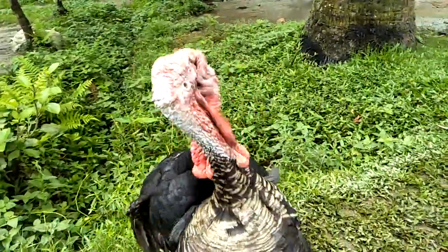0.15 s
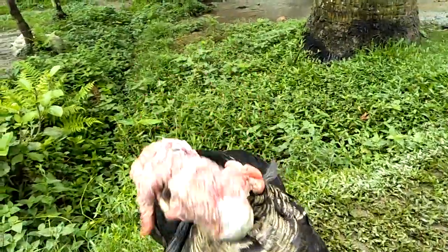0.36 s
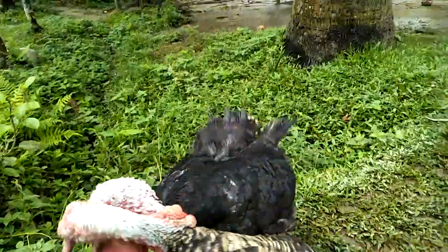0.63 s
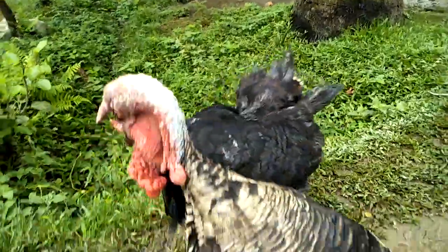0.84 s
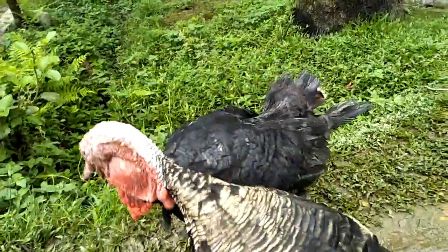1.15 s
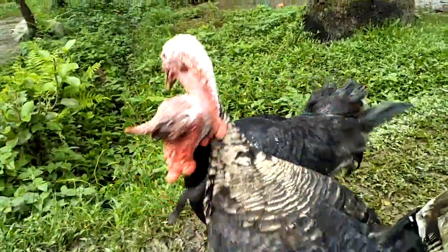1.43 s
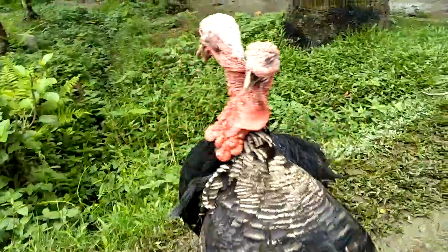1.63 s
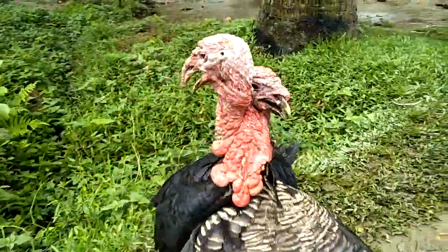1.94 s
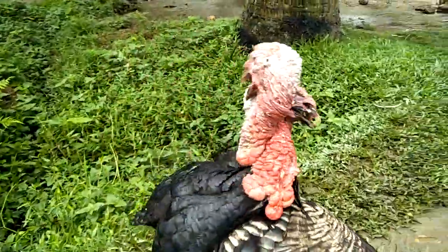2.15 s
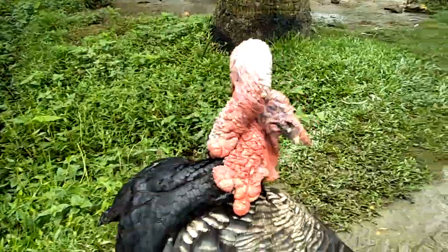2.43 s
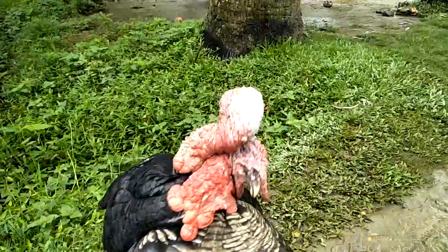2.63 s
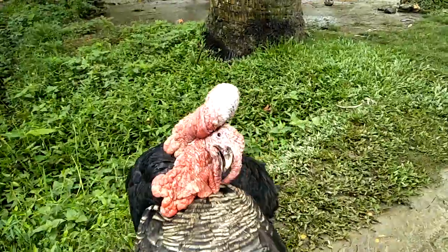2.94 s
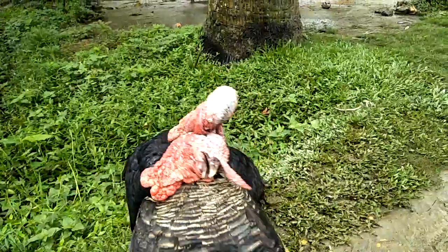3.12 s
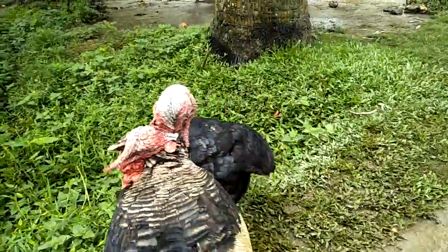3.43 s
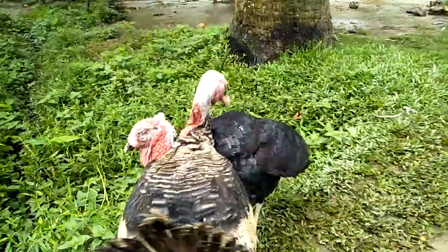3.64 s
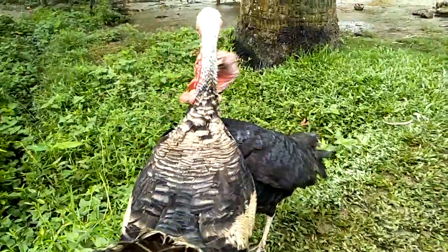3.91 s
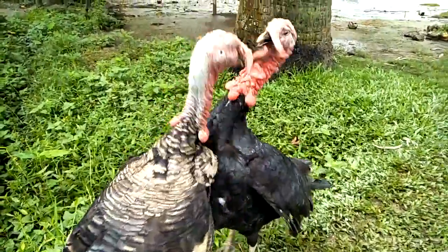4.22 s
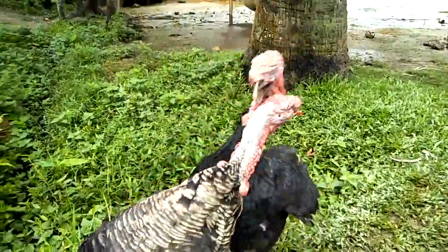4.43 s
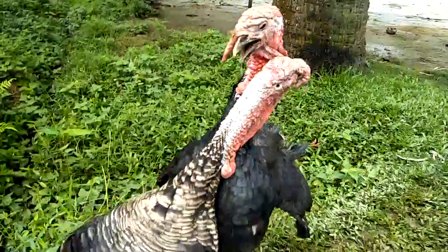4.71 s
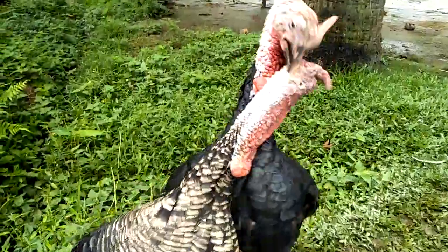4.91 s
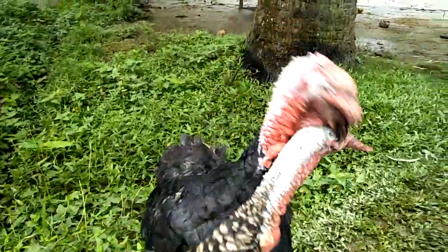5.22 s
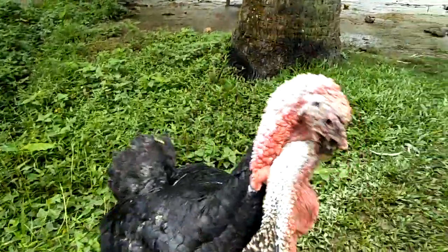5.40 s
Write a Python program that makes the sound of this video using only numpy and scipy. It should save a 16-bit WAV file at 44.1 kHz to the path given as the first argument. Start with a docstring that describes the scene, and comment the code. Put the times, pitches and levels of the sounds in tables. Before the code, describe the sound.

Two turkeys sparring close by give raspy yelps, croaks and short whistled whines, with brief hisses and small thumps in a quiet yard.

```python
"""A quiet grassy yard where two turkeys spar close by.
Their voices are swept harmonic tones: low croaks, whistled whines and quick yelps, raspy when forced.
Hisses are shaped noise; feet and wings thump and snap as short noise bursts.
Far birds chirp as gliding sines over rumble, a distant village and thin air noise.
Two early reflections and a faint noise tail answer from the yard."""
import sys
import numpy as np
from scipy import signal
from scipy.fft import rfft, irfft, next_fast_len
from scipy.io import wavfile
from scipy.ndimage import uniform_filter1d, map_coordinates

SR = 44100
rng = np.random.default_rng(int(sys.argv[2]) if len(sys.argv) > 2 else 0)


def unload_wav(signal):
    """Save mono or channel-first audio to the path in sys.argv[1] as 16-bit WAV at rate SR, clipped to [-1, 1]."""
    wavfile.write(
        sys.argv[1],
        SR,
        np.round(np.clip(np.atleast_2d(signal).T, -1, 1) * 32767).astype(np.int16),
    )


N = 245195


def amp(db):
    """Decibels to gain."""
    return 10 ** (np.asarray(db) / 20)


def unit(x):
    """Scale to rms 1."""
    return x / np.sqrt(np.mean(x ** 2) + 1e-20)


def along(points, hz):
    """(Hz, value) points read on a log frequency axis."""
    f, v = np.transpose(points)
    return np.interp(np.log(hz + 1), np.log(f + 1), v)


def curve(rows):
    """(s, value) rows as one value per sample of the scene."""
    return np.interp(np.arange(N) / SR, *np.transpose(rows))


def add(track, s, sound):
    """Mix a sound into the track at time s."""
    start = max(0, round(s * SR))
    part = track[start:start + len(sound)]
    part += sound[:len(part)]


def wobble(n, rate):
    """A smooth random curve, rate knots a second."""
    knots = rng.standard_normal(int(n * rate / SR) + 4)
    return map_coordinates(knots, [np.arange(n) * rate / SR])


def coloured(x, points):
    """Causal minimum-phase filter with the gain of the (Hz, dB) points."""
    m = 2 * next_fast_len(len(x) // 2 + SR // 20)
    gain = amp(along(points, np.fft.rfftfreq(m, 1 / SR)))
    cepstrum = irfft(np.log(gain))
    cepstrum[1:m // 2] *= 2
    cepstrum[m // 2 + 1:] = 0
    return irfft(rfft(x, m) * np.exp(rfft(cepstrum)), m)[:len(x)]


def noise(points):
    """Noise of rms 1 with the given spectrum."""
    return unit(coloured(rng.standard_normal(N), points))


def resonance(x, hz, width_hz):
    """What one resonance of gain 1 passes."""
    return signal.lfilter(*signal.iirpeak(hz, hz / width_hz, SR), x)


def sine(pitch_hz):
    """A sine that follows a pitch curve."""
    return np.sin(2 * np.pi * np.cumsum(pitch_hz) / SR)


# Decay of the yard's tail. Each row: frequency in Hz, t60 in s at linger 1.
YARD_DECAY = [(200, 1), (1200, 0.43), (3500, 0.91), (8000, 1)]
LEAF_SWAY_S, LEAF_SWAY_RATE_HZ = .00016, 60


def yard(x, linger=1, rise_s=0.0087):
    """Ground, trees and walls return a thin tail that builds and decays; moving leaves blur its pitch."""
    hz, t, z = signal.stft(rng.standard_normal(SR), SR, nperseg=256)
    decay = amp(-60 * t / (linger * along(YARD_DECAY, hz)[:, None]))
    build_up = 1 - np.exp(-t / rise_s)
    tail = signal.istft(z * decay * build_up, SR, nperseg=256)[1]
    echo = signal.fftconvolve(x, tail / np.linalg.norm(tail))
    sway = LEAF_SWAY_S * SR * wobble(N, LEAF_SWAY_RATE_HZ)
    return map_coordinates(echo, [np.arange(N) + sway])


def far_flock(count=26, low_hz=950, high_hz=2300):
    """Other fowl whistle softly across the village, with their echo; rms 1."""
    out = np.zeros(N)
    n = SR // 10
    for when, height, glide in rng.uniform(size=(count, 3)):
        start_hz = low_hz * (high_hz / low_hz) ** height
        glide_ratio = np.geomspace(1, .9 + .15 * glide, n)
        pitch = start_hz * glide_ratio * (1 + .02 * wobble(n, 250))
        add(out, when * N / SR, signal.windows.hann(n) * sine(pitch))
    return unit(out + yard(out))


# Thin hiss of the air. Each row: time in s, level in dB before a 4 dB lift.
AIR_LEVEL = [(1.6, -76.5), (3.5, -75.5)]
# Wash of the far village. Each row: time in s, level in dB before its own flicker.
VILLAGE_LEVEL = [(1.1, -68.5), (1.58, -70), (2.3, -62), (4.6, -69), (5.1, -65)]
# Its spectrum. Each row: frequency in Hz, relative level in dB per Hz.
VILLAGE_SPECTRUM = [(130, 4), (600, -4.5), (1050, 3.5), (1250, -6.5), (1700, 0), (2600, -8), (3200, -4),
                    (4800, -33)]
# The recorder's noise gate briefly pulls the background down. Each row: time in s, gain in dB.
GATE_DIPS = [(3.21, -1), (3.28, -12.5), (3.31, -5.5), (3.34, -17.5), (3.36, 2.5), (4.85, 1), (4.96, -7.5),
             (5.02, 0)]


def background(rumble_db=-61, flock_db=-5):
    """Low rumble, the flickering wash of the far village with its fowl, and a thin, nearly steady hiss."""
    rumble_spectrum = [(15, -19.0), (45, -2.5), (80, 3.0), (130, -8.0), (900, -70.5)]
    rumble = amp(rumble_db + 2.3 * wobble(N, 8.1)) * noise(rumble_spectrum)
    wash = amp(5.7 * wobble(N, 36)) * noise(VILLAGE_SPECTRUM)
    village = amp(curve(VILLAGE_LEVEL)) * (wash + amp(flock_db) * far_flock())
    air = amp(curve(AIR_LEVEL) + 4) * noise([(6500, -0.13), (10000, -0.52), (15500, 0.14)])
    return (rumble + village + air) * amp(curve(GATE_DIPS))


# Filter for voice and hiss. Each row: frequency in Hz, gain in dB.
VOICE_GAIN = [(300, -18), (480, -11), (700, -0.5), (1900, 1), (2500, 0.5), (3300, -8.5), (3750, -20),
              (4300, -34.5), (6000, -47), (10000, -54)]


def voice_filter(x):
    """One filter for voice and hiss: full middle band, weak lows, steep recorder cut above about 3.5 kHz."""
    return coloured(x, VOICE_GAIN)


# Hisses. Each row: start in s, rise in s, hold in s, fall in s, level in dB before the voice filter,
# beak resonance in Hz.
HISSES = [ (0, 0.0004, 0.015, 0.18, -35.5, 1530), (0.532, 0.11, 0.16, 0.2, -37.5, 1530),
          (1.894, 0.19, 0.095, 0.068, -45, 2090), (4.469, 0.012, 0.028, 0.18, -42, 2353),
          (5.424, 0.011, 0.07, 0.11, -42.5, 2800), ]
# Hiss spectrum. Each row: multiple of the beak resonance, relative level in dB per Hz.
HISS_SPECTRUM = [(0.3, -23.5), (0.62, -8.5), (0.8, -7.5), (1, -1.5), (1.139, -5), (1.401, -0.5),
                 (1.801, -14.5), (3, -17)]
# Whistles in a hiss. Each row: multiple of the beak resonance, width in Hz, gain in dB.
EDGE_TONES = [(.635, 16, 8.5), (0.999, 22, 2.5)]
HISS_RISE_DB, HISS_FALL_DB, HISS_FALL_POWER = 16.5, 26.5, 0.53  # drops fast at first, then trails off
HISS_GRIT_DB, HISS_GRIT_RATE_HZ = 1.3, 350


def hisses():
    """Unvoiced air sputters and whistles through the beak; a higher beak resonance is brighter."""
    out = np.zeros(N)
    for s, rise, hold, fall, db, beak_hz in HISSES:
        t = np.arange(int((rise + hold + fall) * SR)) / SR
        before = np.maximum(rise - t, 0) / rise
        after = np.maximum(t - rise - hold, 0) / fall
        level_db = db - HISS_RISE_DB * before - HISS_FALL_DB * after ** HISS_FALL_POWER
        grit = amp(HISS_GRIT_DB * wobble(len(t), HISS_GRIT_RATE_HZ))
        sputter = rng.standard_normal(len(t)) * grit
        air = coloured(sputter, [(beak_hz * k, g) for k, g in HISS_SPECTRUM])
        whistles = sum(amp(g) * resonance(air, beak_hz * k, width) for k, width, g in EDGE_TONES)
        add(out, s, unit(air + whistles) * amp(level_db) * signal.windows.tukey(len(t), .05))
    return voice_filter(out)


# Air forced past the membranes. Each row: frequency in Hz, relative level in dB per Hz.
RASP_AIR = [(300, -8), (600, -2.5), (2900, -5.5), (8000, -16.5)]
RASP_AIR_DB, RASP_SMEAR = -20, .2


def syrinx(pitch, rasp, bright_db, clean_db=-32, forced_db=23,
           second=.52, coupling=0.74, second_db=-14, blend_hz=1450):
    """A near-pure whistle whose membranes slap, beat against each other and leak air when forced."""
    n = len(pitch)
    jitter = (.003 + .028 * rasp) * wobble(n, 600)
    phase = 2 * np.pi * np.cumsum(pitch * (1 + jitter)) / SR
    overtone_db = clean_db + bright_db + forced_db * rasp  # harder closure, stronger overtones
    tone = np.sin(phase)
    for k in range(2, 6):
        waver_db = 1.2 * k * wobble(n, 80)
        # uneven closures blur the upper partials
        slip = RASP_SMEAR * rasp ** 2 * (k - 1) * wobble(n, 650) + rng.uniform(0, 2 * np.pi)
        partial_db = overtone_db * np.log2(2 * k) / 2 + waver_db
        tone = tone + amp(partial_db) * np.sin(k * phase + slip)
    # the slower other side puts sidebands between the harmonics of low notes
    other = np.sin(second * phase + wobble(n, 120)) / (1 + (pitch / blend_hz) ** 8)
    rough = 0.002 + rasp ** 2.7
    voiced = tone * (1 + rough * coupling * other) + rough * amp(second_db) * other
    puffs = (1 + np.sin(phase)) / 2  # one a cycle
    air = unit(coloured(rng.standard_normal(n), RASP_AIR)) * puffs
    leak = amp(RASP_AIR_DB) * (0.0081 + rasp ** 2) * air * 2
    return (voiced + leak) / np.sqrt(1 + amp(2 * overtone_db))


def syllable(pitch, db, centre_hz, rasp, bright_db, strain=0.68, crack=0.26):
    """One note; it roughens away from its central pitch and cracks far above it."""
    octaves = np.log2(pitch / centre_hz)
    overshoot = np.clip((octaves - .12) / .2, 0, 1)
    strained = np.clip(rasp + strain * np.abs(octaves) + crack * overshoot, 0, 1)
    edges = signal.windows.tukey(len(db), .006 * SR / len(db))
    return edges * amp(db) * syrinx(pitch, strained, bright_db)


# Low-register croaks, most leading into a whine. Each row: start in s, length in s, pitch in Hz,
# glide in octaves, level in dB before the voice filter, base rasp 0-1, overtone lift in dB.
CROAKS = [ (0.259, 0.019, 723, .2, -20, 0.43, -0.5), (1.639, 0.044, 705, 0.35, -21.5, 0.43, 5.5),
          (1.873, 0.025, 651, -0.4, -22.5, 0.75, 1.5), (3.361, 0.012, 845, 0.1, -21, 0, -13.5),
          (3.802, 0.023, 691.5, 0.42, -32, 1, -8.5), (3.98, 0.018, 757.4, 0.049, -24.5, 0.3, 8.5),
          (5.42, 0.085, 782, 0.21, -9, 0.25, -11), ]
CROAK_ATTACK_S, CROAK_RELEASE_SHARE, CROAK_SETTLE_SHARE = .007, 0.27, 0.34
CROAK_WEAK_DB, CROAK_RAGGED = 8.5, 0.48  # starts weaker and raspier


def croaks():
    """Low, gliding notes that start ragged and settle into a fuller tone."""
    out = np.zeros(N)
    for s, length, hz, glide_octaves, db, rasp, bright_db in CROAKS:
        t = np.arange(int(length * SR)) / SR
        pitch = hz * 2 ** (glide_octaves * (t / length - .5))
        unsettled = np.exp(-(t / length / CROAK_SETTLE_SHARE) ** 2)
        level_db = db - CROAK_WEAK_DB * unsettled
        attack = np.minimum(t / CROAK_ATTACK_S, 1)
        release = np.minimum((1 - t / length) / CROAK_RELEASE_SHARE, 1)
        note = syllable(pitch, level_db, hz, rasp + CROAK_RAGGED * unsettled, bright_db)
        add(out, s, attack * release * note)
    return out


# High-register whines. Each row: start in s, length in s, start in Hz, end in Hz, mid-note bend in Hz,
# level in dB before the voice filter, swell over the note in dB, mid-note fullness in dB,
# base rasp 0-1, overtone lift in dB.
WHINES = [ (0.272, 0.089, 1076, 1165, -17.5, -11.5, -3, -4.5, 0.3, 2.5),
          (1.074, 0.14, 1134, 1294, -14, -37.5, 5, 4.5, 0.38, 9.5),
          (1.233, 0.031, 1044, 952, -4.5, -40, -10, -4.5, .1, 1.5),
          (1.671, 0.057, 1112, 1106, 3, -21, 2, 3, 0.38, 5),
          (1.815, 0.036, 965, 1129, -8, -18, -3, 8.5, 0.76, 5.5),
          (1.915, .011, 2446, 2557, 7, -22, -5, -2, 0.4, 3),
          (2.498, 0.076, 1087, 1235, 19, -20, 5.5, 5.5, 0.05, 8.5),
          (2.615, 0.031, 973, 902.6, -17.5, -32, -1, 1.5, 0.2, 2),
          (3.369, 0.06, 1096, 1150, 38.5, -10, -1, 2, 0.05, 6.5),
          (3.422, 0.032, 1365, 1399, -18.5, -20, 1.5, -2, 0.2, 10.5),
          (3.478, 0.031, 1142, 963, -12.5, -19, -12.5, 5, 0, 5.5),
          (3.82, 0.094, 1142, 1111, 21.5, -24, 16, 9.5, 0.32, -3),
          (3.998, 0.033, 1145, 1166, -50.5, -10.5, -0.5, 6, 0.27, 4), ]
WHINE_ATTACK_S, WHINE_RELEASE_S = 0.009, 0.0097
WAVER_SHARE, WAVER_DB = 0.0048, 0.15  # uneven air pressure moves pitch and level together
SCOOP_OCTAVES, SCOOP_S = 0.06, 0.019  # slides up into its pitch
FLICK_OCTAVES, FLICK_FADE_DB = 0.71, 21.5  # flicks upward as it dies


def whines():
    """Held whistles: a scoop into the note, a slow glide, an upward flick as the air runs out."""
    out = np.zeros(N)
    for s, length, start_hz, end_hz, bend_hz, db, swell_db, arch_db, rasp, bright_db in WHINES:
        t = np.arange(int((length + WHINE_RELEASE_S) * SR)) / SR
        held = np.minimum(t / length, 1)
        arch = np.sin(np.pi * held)
        dying = np.sin(np.pi / 2 * np.maximum(t - length, 0) / WHINE_RELEASE_S)
        glide = start_hz + (end_hz - start_hz) * held + bend_hz * arch
        pitch = glide * 2 ** (FLICK_OCTAVES * dying ** 2 - SCOOP_OCTAVES * np.exp(-t / SCOOP_S))
        level_db = db + swell_db * (held - .5) + arch_db * (arch - .5) - FLICK_FADE_DB * dying
        unsteady = wobble(len(t), 55)
        pitch = pitch * (1 + WAVER_SHARE * unsteady)
        level_db = level_db + WAVER_DB * unsteady
        note = syllable(pitch, level_db, glide, rasp, bright_db)
        add(out, s, np.minimum(t / WHINE_ATTACK_S, 1) * note)
    return out


# Far chirps and soft whistles. Each row: start in s, length in s, start in Hz, end in Hz,
# level in dB, echo in dB relative to the chirp.
CHIRPS = [ (0.385, 0.061, 5570, 5260, -62, -11), (0.689, 0.048, 3620, 2960, -55.5, -15),
          (0.967, 0.021, 3564, 3050, -56, -2), (2.313, 0.14, 1957, 1965, -59, -12.5),
          (2.683, 0.12, 4970, 3220, -66, -3.5), (2.975, 0.037, 3650, 2930, -53, -5.5),
          (3.039, 0.12, 1440, 1424, -59, -7), (3.095, 0.078, 1023, 1047, -55.5, -7.5),
          (4.07, 0.14, 4440, 2910, -63, -9.5), (4.307, 0.042, 3300, 2780, -53.5, 4),
          (4.736, 0.083, 1562, 1710, -55.5, -3), (5.067, 0.027, 2028, 2206, -53.5, -0.5),
          (5.129, 0.12, 2140, 1810, -52, -2.5), (5.354, 0.02, 2100, 2000, -57.5, -7.5), ]
CHIRP_BEND = 1.5  # exponent: the glide starts level and steepens
CHIRP_FLUTTER_HZ, CHIRP_FLICKER_DB = 45, 3


def far_birds():
    """Thin fluttering sines glide from the trees, each with its own share of echo."""
    direct, scattered = np.zeros(N), np.zeros(N)
    for s, length, start_hz, end_hz, db, echo_db in CHIRPS:
        n = int(length * SR)
        glide = start_hz + (end_hz - start_hz) * np.linspace(0, 1, n) ** CHIRP_BEND
        pitch = glide + CHIRP_FLUTTER_HZ * wobble(n, 400)
        level = amp(db + CHIRP_FLICKER_DB * wobble(n, 87))
        chirp = level * signal.windows.tukey(n, .6) * sine(pitch)
        add(direct, s, chirp)
        add(scattered, s, amp(echo_db) * chirp)
    return direct + yard(scattered, linger=1.5)


# Quick yelps. Each row: start in s, rise in s, fall in s, start in Hz, pitch at the peak in Hz,
# levelled-off pitch in Hz, leap at the break in octaves, peak in dB before the catch and voice filter,
# base rasp 0-1, overtone lift in dB, catch delay in s, beak resonance in Hz, its gain in dB.
YELPS = [ (0.431, 0.018, 0.026, 627, 966, 1131, 0.39, -6.5, 1, 1, 0.014, 1670, -11.5),
         (.511, 0.022, 0.0088, 611.5, 1109, 1102, 0.018, -7, 0.87, 0, 0.012, 2170, -29),
         (1.271, 0.021, 0.031, 887, 1553, 1827, 0.22, -24, 0.36, 5.5, 0.021, 3210, 10),
         (1.376, 0.018, 0.024, 968, 1710, 1925, 0.28, -19, 0.29, -0.5, 0.021, 2950, 3),
         (1.796, 0.026, 0.0096, 549, 963, 995, 0.081, -17, 0.69, 1, 0.02, 2600, 3),
         (1.892, .017, 0.017, 689, 1161, 1181, 0.04, -10.5, 0.93, -2.5, .012, 2160, 0.5),
         (1.927, .011, 0.012, 2077, 1080, 713, 0.062, -20, 0.8, -1.5, 0.0049, 2000, 0.5),
         (2.462, 0.017, 0.04, 921, 1063, 1097, 0.049, -9.5, 0, 1, 0.027, 2270, 12),
         (2.639, 0.019, .022, 887, 1293, 1331, .42, -10, 0.1, -1, .0115, 2730, -1.5),
         (2.719, 0.013, 0.018, 933, 1240, 1359, 0.5, -7.5, 0.28, 1.5, 0.0085, 2810, 0.5),
         (3.520, 0.013, 0.025, 1000, 1171, 1400, 0.31, -7, 0, 4, 0.015, 2800, 16),
         (3.602, 0.015, 0.018, 960, 1214, 1391, 0.42, -5, 0.14, -1, 0.016, 2776, 16),
         (5.485, 0.0083, 0.027, 910, 1262, 1277, 0.066, -14.5, 0.33, -7, 0.0086, 2800, 4), ]
YELP_RISE_DB, YELP_RISE_POWER = 19.5, 2.6
YELP_FALL_DB, YELP_FALL_POWER = 39.5, 1.88
BREAK_SHARE = .48  # how far into its fade the voice breaks upward
YELP_DULL_DB = 3  # overtones are this much weaker before the pressure builds
SWEEP_EASE = 1.25  # above 1 the sweep slows as it nears the peak
CATCH_DB, CATCH_WIDTH_S = 11, 0.0023  # the voice catches as it hops to the next register
BEAK_WIDTH_HZ = 74


def yelps():
    """One push of air each: pitch sweeps, catches, levels off and leaps; the beak picks out one band."""
    out = np.zeros(N)
    for (s, rise, fall, start_hz, peak_hz, top_hz, leap, db, rasp, bright_db,
         catch, beak_hz, beak_db) in YELPS:
        t = np.arange(int((rise + fall) * SR)) / SR
        before = np.maximum(rise - t, 0) / rise
        after = np.maximum(t - rise, 0) / fall
        settled = np.sin(np.pi / 2 * np.minimum(after / BREAK_SHARE, 1))
        sweep = peak_hz * (start_hz / peak_hz) ** (before ** SWEEP_EASE) * (top_hz / peak_hz) ** settled
        pitch = sweep * 2 ** (leap * (after > BREAK_SHARE))
        level_db = db - YELP_RISE_DB * before ** YELP_RISE_POWER - YELP_FALL_DB * after ** YELP_FALL_POWER
        level_db = level_db - CATCH_DB * np.exp(-((t - catch) / CATCH_WIDTH_S) ** 2)
        note = syllable(pitch, level_db, peak_hz, rasp, bright_db - YELP_DULL_DB * before ** 2)
        note = np.pad(note, (0, SR // 50))  # room for the beak to ring on
        add(out, s, note + amp(beak_db) * resonance(note, beak_hz, BEAK_WIDTH_HZ))
    return out


# Tube resonances. Each row: frequency in Hz, width in Hz, gain in dB.
WINDPIPE = [(1740, 170, -6.5)]


def windpipe(x):
    """A narrow tube resonance flares and rings on as the overtones sweep through it."""
    return x + sum(amp(db) * resonance(x, hz, width) for hz, width, db in WINDPIPE)


def calls(voice_db=-0.74):
    """Croaks, whines and yelps, all shaped by the same voice filter and windpipe."""
    return windpipe(voice_filter(amp(voice_db) * (croaks() + whines() + yelps())))


def blow(spectrum, t60):
    """A noise burst of peak 1 that decays at t60, cut at a third of a second."""
    t = np.arange(SR // 3) / SR
    burst = coloured(rng.standard_normal(len(t)) * amp(-60 * t / t60), spectrum)
    return burst / np.abs(burst).max()


# Sharp snaps of beak and feather. Each row: start in s, peak in dB.
SNAPS = [(0.449, -18), (1.175, -34.5), (3.6725, -18)]
# Snap spectrum. Each row: frequency in Hz, relative level in dB per Hz.
SNAP_SPECTRUM = [(700, 2.5), (1600, 3.5), (3200, -5), (6500, -36), (10500, -23), (15000, -39)]
# Feet and wings thumping. Each row: start in s, peak in dB before the turf, t60 in s, boom in Hz.
THUMPS = [(1.183, -39.5, 0.83, 84), (1.21, -36.5, 0.049, 340), (1.338, -39, .015, 750),
          (2.362, -24, 0.011, 300), (2.384, -26.5, 0.0096, 192), (2.4, -32, 0.16, 87.4),
          (2.923, -33.5, 0.22, 78.6), (3.674, -25.5, 0.011, 326), (3.681, -33, 0.72, 71.9),
          (4.432, -41.5, 0.032, 643), (5.367, -36.5, 0.025, 750)]
# Thump spectrum. Each row: multiple of the boom, relative level in dB per Hz.
THUMP_SPECTRUM = [(.3, -11.5), (1, 7.5), (1.7, -6), (4, -7.5), (20, -50)]
# Soft ground dulls every thump. Each row: frequency in Hz, gain in dB.
TURF = [(1300, -0.5), (3000, -25.5)]


def scuffle():
    """Feet and wings thump as bursts dulled by turf; a few dry snaps decay in milliseconds."""
    out = np.zeros(N)
    for s, db, t60, boom_hz in THUMPS:
        add(out, s, amp(db) * blow([(boom_hz * k, g) for k, g in THUMP_SPECTRUM], t60))
    out = coloured(out, TURF)
    for s, db in SNAPS:
        add(out, s, amp(db) * blow(SNAP_SPECTRUM, t60=.006))
    return out


# Reflections off the ground and the tree trunk. Each row: delay in s, gain in dB.
BOUNCES = [(.0055, -24.5), (0.01, -26.5)]


def scene():
    """Near turkeys with two close reflections and a thin tail, over far birds and the background."""
    near = calls() + hisses() + scuffle()
    early = sum(amp(db) * np.pad(near, (round(delay * SR), 0))[:N] for delay, db in BOUNCES)
    tail = amp(-19.5) * yard(near)
    return (near + early + tail + far_birds() + background())[None]


GATE_DB, GATE_WINDOW_S, GATE_STEEPNESS = -68, .003, 9
TOP_HZ = 15800


def record(dry):
    """A fast noise gate stutters shut in the quietest moments; nothing is kept above the band limit."""
    power = uniform_filter1d(dry ** 2, int(GATE_WINDOW_S * SR))
    level = np.sqrt(np.abs(power) + 1e-12)
    gated = dry / (1 + (amp(GATE_DB) / level) ** GATE_STEEPNESS)
    m = next_fast_len(N + SR // 2)
    kept = np.fft.rfftfreq(m, 1 / SR) < TOP_HZ
    return irfft(rfft(gated, m) * kept, m)[..., :N]


dry = scene()
out = record(dry)
unload_wav(out)
```